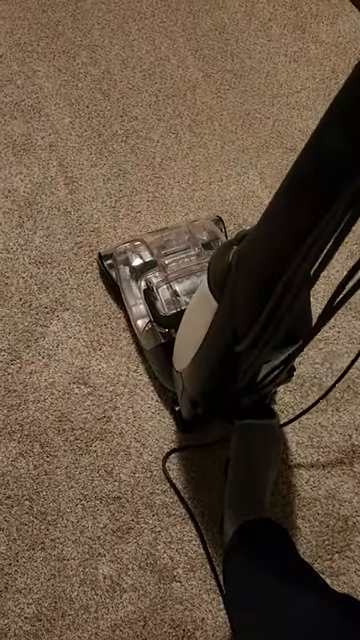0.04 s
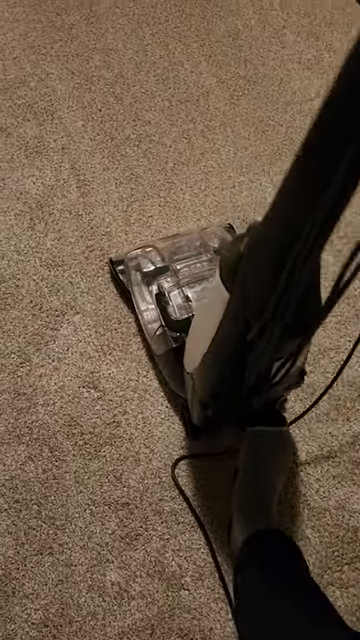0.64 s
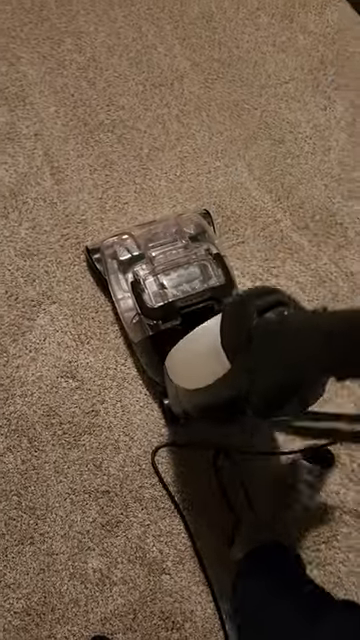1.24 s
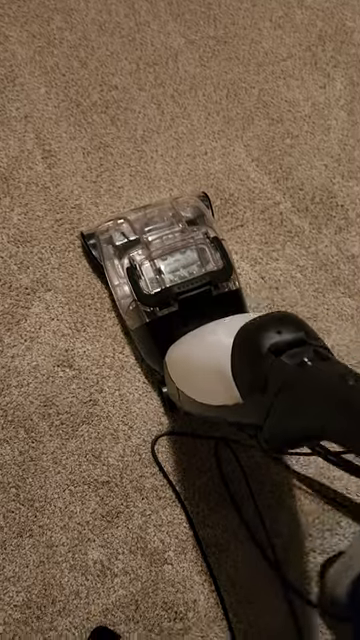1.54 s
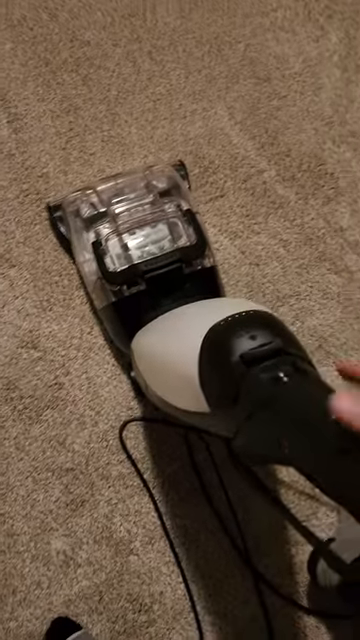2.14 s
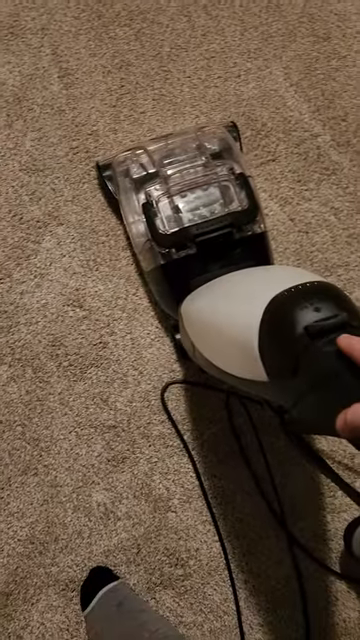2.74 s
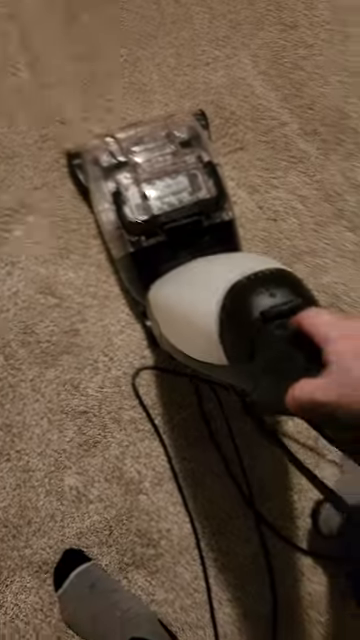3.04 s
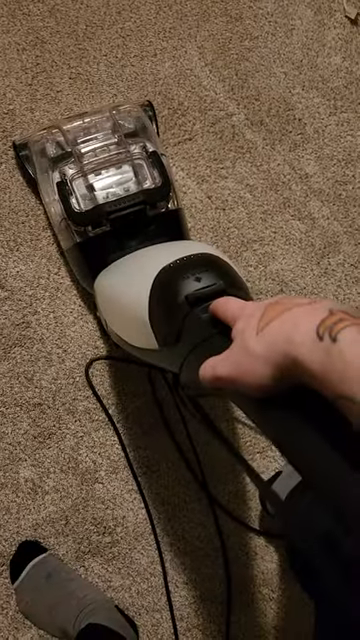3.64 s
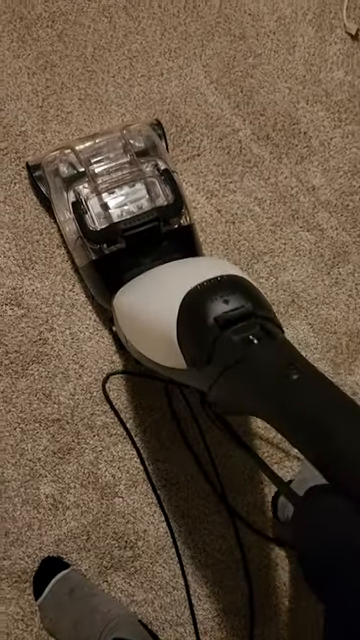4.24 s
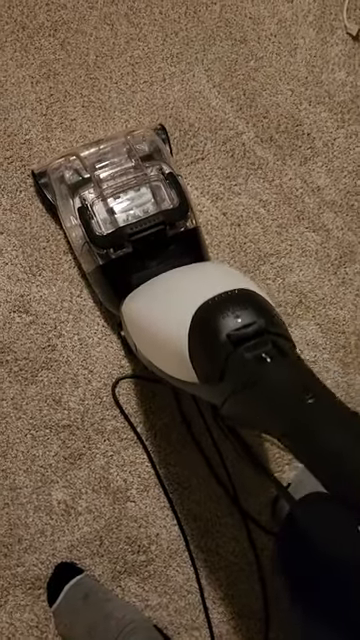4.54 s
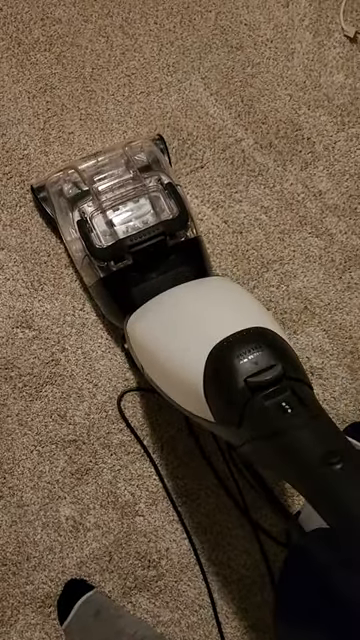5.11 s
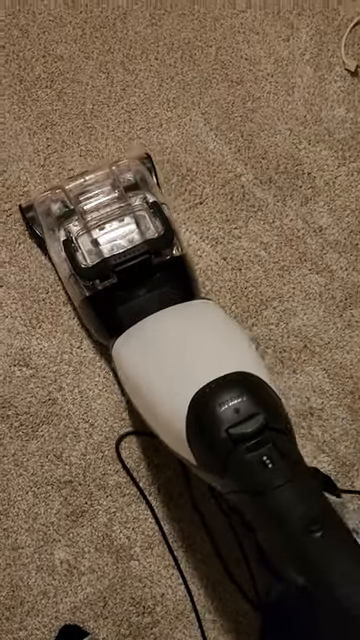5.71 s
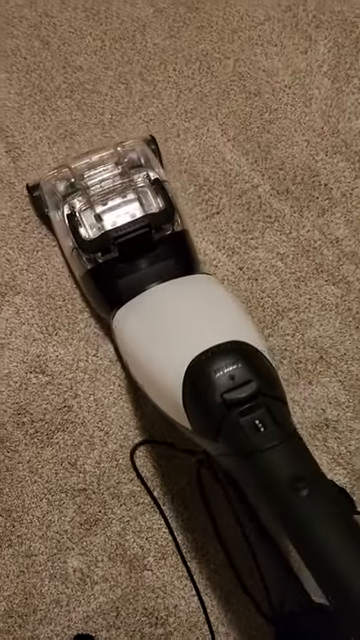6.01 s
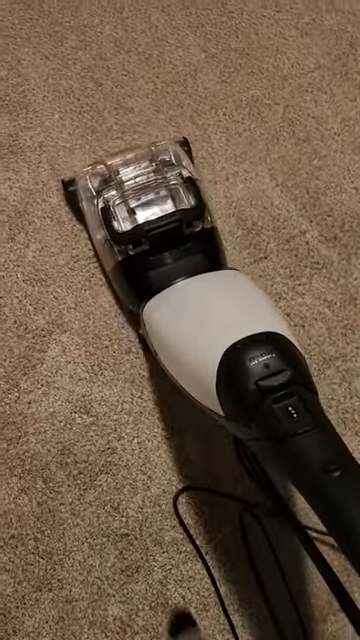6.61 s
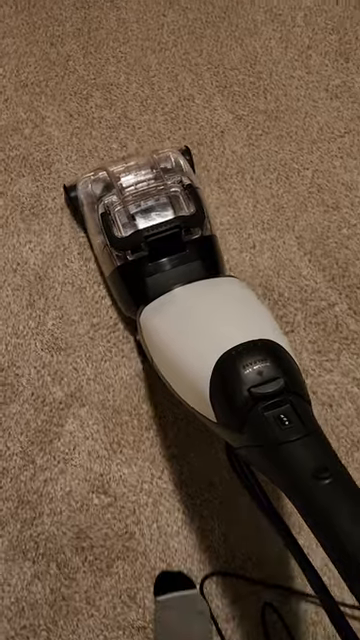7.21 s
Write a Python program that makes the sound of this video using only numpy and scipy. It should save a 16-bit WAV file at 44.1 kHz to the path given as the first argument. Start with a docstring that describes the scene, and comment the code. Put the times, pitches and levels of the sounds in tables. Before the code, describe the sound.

Heard from the handle in a room with little echo, an upright carpet cleaner gives a few plastic knocks as it leans back, followed by faint rustling of clothing and carpet. After a short lull, its power switch clicks sharply. The motor spins up with a rising whine and settles into a constant, humming roar of air, with one soft footstep barely audible beneath it.

```python
"""Plastic knocks as an upright carpet cleaner is tilted back, heard from its handle in a carpeted room.
Cloth brushes softly, the rocker switch snaps and the suction motor runs up. The windings hum,
shaft unbalance and fan blades give a rising whine, and turbulent air roars through the housing,
hisses from the vents and whistles in the ducts. One soft footfall lands under the roar."""
import sys
import numpy as np
from scipy import signal
from scipy.io import wavfile
from scipy.ndimage import uniform_filter1d

SR = 44100
rng = np.random.default_rng(int(sys.argv[2]) if len(sys.argv) > 2 else 0)


def bounce(signal):
    """Save signal as a 16-bit WAV file at the path given by the first command-line argument."""
    frames = np.transpose(np.atleast_2d(signal))
    limited = np.clip(frames, -1, 1)
    pcm = np.round(limited * 32767).astype(np.int16)
    wavfile.write(sys.argv[1], SR, pcm)


N = 324576
TIME = np.arange(N) / SR
SNAP_S, POWER_ON_S, FULL_SPEED_HZ = 3.6434, 3.646, 405.75

# Noise spectra. Each row: frequency in Hz, relative density in dB.
AMBIENT_SPECTRUM = [(15, -9), (30, -1), (62, 0), (98, -13), (190, -8), (270, -17), (350, -10), (480, -26),
                    (750, -27), (1100, -37), (1500, -35), (2800, -48), (6500, -55), (7700, -44),
                    (8800, -60), (16000, -63)]
CARPET_SPECTRUM = [(90, -33), (170, 7.5), (270, -4), (480, -5.5), (750, -3), (1150, -14), (1500, -10),
                   (2200, -12), (2700, -21), (3500, -25.5), (8000, -25), (9500, -62)]
CLOTH_SPECTRUM = [(700, -30), (1200, -12), (1550, -5.5), (2200, -5), (2650, -13), (3100, -7), (3800, -10),
                  (5200, -6.5), (6500, -11), (7600, -4.5), (9000, -11), (10500, -16.5), (12000, -11.5),
                  (15500, -18)]
SOCK_SPECTRUM = [(1000, -22), (3800, -10), (4800, -2), (5600, -2), (6500, -15), (16000, -35)]
RUMBLE_SPECTRUM = [(30, -38), (85, -14), (108, -6.5), (200, -2), (340, 0), (500, 2.5), (720, 1.5),
                   (900, -5), (1150, -8), (2500, -48)]
RUSH_SPECTRUM = [(400, -40), (850, -1), (1100, 1), (1450, -1), (1750, -1), (2080, -2.5), (2250, -4),
                 (2600, -6), (2900, -14), (4500, -37)]
HISS_SPECTRUM = [(1500, -13), (3000, -2.5), (3600, -1.5), (4150, -4), (4900, 0), (5600, -2), (6100, -1.5),
                 (6700, -3), (7500, -0.5), (9200, -10.5), (10900, -10), (11600, -5.5), (13000, -7),
                 (14000, -11), (16000, -9.5)]

# Stereo likeness of noise. Each row: frequency in Hz, left-right coherence from 0 to 1.
COHERENCE = [(25, .8), (70, .97), (130, .985), (290, .92), (640, .8), (1000, .55), (2000, .5), (3500, .2),
             (16000, .15)]
# Stereo balance of noise. Each row: frequency in Hz, left over right in dB.
BALANCE = [(60, 0.5), (110, 0), (200, 0.5), (380, 1.5), (700, 2), (1290, -1), (2380, 4), (4400, 1),
           (8120, 2.5), (15000, -0.5)]
# Stereo phase of noise. Each row: frequency in Hz, left lead in radians.
LEFT_LEAD = [(300, 0), (860, .25), (1300, 1.4), (2000, 1.8), (3000, 1.8), (16000, 1.6)]
# Room decay. Each row: frequency in Hz, T60 in seconds.
ROOM_DECAY = [(100, 0.16), (500, 0.22), (2000, 0.27), (8000, 0.15), (16000, 0.058)]

# Peaks and dips. Each row: centre in Hz, width in Hz, gain in dB.
ROOM_MODES = [(157, 12, 8), (173, 10, -8), (190, 12, 7), (236, 14, -4), (283, 14, 3), (300, 12, -6),
              (538, 16, -8)]
HOUSING_MODES = [(338, 72, 7), (455, 20, 0), (498, 25, 1), (570, 44, 3.5), (699, 12, 7.5), (747, 70, -3),
                 (816, 54, 6.5), (955, 27, -3), (1054, 20, -9), (1098, 10, 3.5), (1261, 17, 6.5),
                 (1360, 37, 2), (1458, 45, 10), (1610, 41, 6), (1866, 72, 9.5), (2316, 26, 6)]
TONE_RESPONSE = [(266, 50, 6.5), (301, 5.2, -11), (345.8, 14, 9.5), (367.4, 5, -18), (376.3, 22, 5),
                 (548, 68, -14), (668, 30, 3.5), (714, 18, 6), (754, 31, -14.5), (1400, 220, 6),
                 (1710, 180, -11), (2150, 170, 5.5), (2290, 65, -10), (2580, 230, 5.5), (2740, 104, -15.5)]  # housing and room, as swept by the motor tones

# Weight shifts on the pile. Each row: peak time in seconds, level in dB.
WEIGHT_SHIFTS = [(.45, -64.5), (1.0, -65.5), (1.68, -71), (1.85, -57.5), (2.2, -74), (2.82, -57),
                 (3.1, -72)]
# Fabric strokes. Each row: start, rise and hold in seconds, cloth and sock levels in dB.
FABRIC_STROKES = [(.7, .2, .15, -76, -90), (1.169, .16, 0.053, -62, -58.5), (1.486, 0.33, 0.068, -57, -67),
                  (1.855, 0.035, .015, -53, -75), (2.055, 0.047, 0.058, -51, -51.5),
                  (2.137, 0.073, 0.098, -52.5, -67), (2.642, 0.07, 0.091, -60.5, -80),
                  (3.22, 0.093, .04, -73, -90)]
# Ring of the plastic body. Each row: frequency in Hz, relative level in dB, T60 in seconds.
BODY_MODES = [(182, -3, 0.058), (377, -1, 0.029), (500, 3, 0.026), (700, 4, 0.015), (816, 7, 0.016),
              (1150, 0, 0.021), (1900, 2, 0.017), (2295, -6, 0.029), (5260, -4.5, 0.028), (7520, 11, 0.012)]
# Joint ticks. Each row: start in seconds, level in dB, low and high edge in Hz, rattle decay in seconds.
JOINT_TICKS = [(.295, -41, 350, 1800, 0.015), (0.315, -44, 200, 700, 0.0095), (.568, -50, 900, 1600, .008),
               (.684, -45.5, 1730, 3800, .011), (.818, -43.5, 600, 1470, .015),
               (.849, -32, 400, 1350, .025), (0.9346, -39, 500, 2500, .006), (1.18, -39, 350, 1900, .014),
               (1.244, -43, 500, 4000, .014), (1.246, -53, 4000, 14000, .008),
               (1.44, -51.5, 500, 1810, .01), (1.855, -43.5, 300, 1290, 0.018),
               (2.13, -44, 546, 1390, .015), (2.81, -49, 600, 2980, .007), (3.596, -48, 1110, 2600, 0.011)]
# Handle unlatching, base dropping back. Each row: start in seconds, level in dB, high edge in Hz, rattle
# share from 0 to 1, rattle decay in seconds, crack and thud levels in dB, thud decay in seconds.
TILT_CLUNKS = [(0.3618, -36, 2360, 0.08, .04, -66, -38.5, .015),
               (.842, -26, 1400, 0.5, 0.015, -55.5, -30.5, 0.099),
               (0.9372, -28, 1570, .5, .018, -48, -37, .04)]

# Duct whistles. Each row: time in seconds, low whistle in dB, high whistle in Hz, high whistle in dB.
DUCT_WHISTLES = [(3.65, -74, 1700, -70), (4.0, -42, 1780, -36), (4.25, -30.5, 1849, -22.5),
                 (4.5, -29, 1900, -29.5), (5.4, -26, 1994, -30.5), (5.85, -21.5, 2041, -29),
                 (6.05, -23.5, 2060, -31), (6.17, -21, 2072, -22), (6.5, -29.5, 2080, -28),
                 (7.0, -22.5, 2060, -33), (7.36, -40, 2080, -34)]
# Winding hum. Each row: frequency in Hz, level in dB.
HUM_PARTIALS = [(119.9, -38), (240, -43.5), (360, -56)]
# Main tones in multiples of the shaft rate: shaft, its double, seven fan blades, their octave.
TONE_ORDERS = (1, 2, 7, 14)
# Voicing of those tones. Each row: base level in dB, shaft rate at half amplitude in Hz, onset exponent,
# waver ratio, left over right in dB, left lead in radians.
MOTOR_TONES = [(-21, 247, 17, 0.087, 2.5, 0.21), (-26.5, 234, 8.2, 0.29, 1, 0.45),
               (-34.5, 215, 4.4, 0.29, 2, 1.4), (-41.5, 380, 28, 0.4, 1, 0.83)]
# Fading as the listener moves through standing waves. Each row: time in seconds, four tone gains in dB.
TONE_FADING = [(4.5, 1, 2, -1, 0), (4.7, -2.5, 2, 0.5, 5.5), (5.0, 1, 4, -3, 0), (5.22, -2, 0.5, 1.5, 5),
               (5.45, -9.5, -3, 2.5, -6), (5.68, -7.5, -2.5, 4.5, 2), (5.85, -2.5, -0.5, 8.5, 3.5),
               (6.2, -3.5, -5.5, 0, 8.5), (6.55, -4, 2, 1.5, -14), (6.9, -12, 2.5, 1.5, 4),
               (7.12, -8.5, 3.5, 4.5, -8), (7.36, -37, 5.5, -5, 0)]
# Faint overtones. Each row: multiple of the shaft rate, level at top speed in dB.
SHAFT_OVERTONES = [(3, -54), (4, -38), (5, -32.5), (12, -49), (19, -45.5), (21, -48.5), (28, -65)]


def amp(db):
    return 10 ** (np.asarray(db) / 20)


def unit_rms(x):
    return x / np.sqrt(np.mean(abs(x) ** 2) + 1e-20)


def log_interp(points, hz):
    knots_hz, values = np.transpose(points)
    return np.interp(np.log(hz + 1), np.log(knots_hz + 1), values)


def time_curves(rows):
    knots_s, *columns = np.transpose(rows)
    return [np.interp(TIME, knots_s, column) for column in columns]


def resonance_db(modes, hz):
    return sum(db / (1 + (2 * (hz - centre_hz) / width_hz) ** 2) for centre_hz, width_hz, db in modes)


def add(mix, start_s, sound):
    part = mix[:, round(start_s * SR):][:, :sound.shape[1]]
    part += sound[:, :part.shape[1]]


def drift(corner_hz, hop=64):
    """Slow complex noise, rms 1."""
    count = N // hop + 2
    white = rng.standard_normal(count) + 1j * rng.standard_normal(count)
    hz = np.fft.fftfreq(count, hop / SR)
    slow = np.fft.ifft(white / (1 + (hz / corner_hz) ** 2))
    return unit_rms(np.interp(np.arange(N), np.arange(count) * hop, slow))


def noise(spectrum, modes=(), patchy_db=0.5, size=4096):
    """Coloured stereo noise with drifting patches, rms 1; the bass is alike on both sides."""
    hz = np.fft.rfftfreq(size, 1 / SR)
    left_re, left_im, own_re, own_im, patches = rng.standard_normal((5, N * 4 // size + 5, len(hz)))
    patches = uniform_filter1d(patches, size=4, axis=0)
    patches = unit_rms(uniform_filter1d(patches, size=30, axis=1))
    db = log_interp(spectrum, hz) + resonance_db(modes, hz) + patchy_db * patches
    # standing reflections comb the treble, differently on each side
    comb = unit_rms(uniform_filter1d(rng.standard_normal((2, 1, len(hz))), size=5))
    db = db + 1.7 * comb * np.clip(hz / 3000, 0, 1)
    coherence = log_interp(COHERENCE, hz)
    left = left_re + 1j * left_im
    right = coherence * left + np.sqrt(1 - coherence ** 2) * (own_re + 1j * own_im)
    right *= np.exp(-1j * log_interp(LEFT_LEAD, hz))
    pan = amp(log_interp(BALANCE, hz) / 2)
    frames = np.array([left * pan, right / pan]) * amp(db)
    _, wave = signal.istft(frames.swapaxes(1, 2), nperseg=size, noverlap=size - size // 4)
    return unit_rms(wave[:, :N])


def tone(turns, db, waver, pan_db=0, lead_rad=0):
    """One partial; shifting reflections make it waver differently on each side."""
    direct = np.array([[amp(pan_db / 2) * np.exp(1j * lead_rad)], [amp(-pan_db / 2)]])
    paths = (direct + waver * np.array([drift(4.3), drift(14)])) / np.sqrt(1 + waver ** 2)
    return np.sqrt(2) * amp(db) * (paths * np.exp(2j * np.pi * turns)).real


def room_tail(x, size=16384, density=0.08, gap_s=0.006):
    """Scattered reflections with a short decay."""
    taps = rng.standard_normal((2, size)) * (rng.random((2, size)) < density)
    taps *= np.arange(size) > gap_s * SR
    hz, t, frames = signal.stft(taps, SR, nperseg=256)
    decay = amp(-60 * t / log_interp(ROOM_DECAY, hz)[:, None])
    _, tail = signal.istft(frames * decay, SR, nperseg=256)
    return signal.fftconvolve(x, tail / np.linalg.norm(tail[0]), axes=1)[:, :N]


def ambience(db=-56.5):
    """Faint low rumble of the still room."""
    return amp(db) * noise(AMBIENT_SPECTRUM)


def carpet_rustle(rest_db=-70, rise_s=0.081, fall_s=0.16):
    """The pile rustles under the base, more with each shift of weight."""
    swells = sum(amp(db) * np.exp(-np.maximum((peak_s - TIME) / rise_s, (TIME - peak_s) / fall_s))
                 for peak_s, db in WEIGHT_SHIFTS)
    return (amp(rest_db) + swells) * noise(CARPET_SPECTRUM, ROOM_MODES, patchy_db=1.2)


def brushing(release_s=0.083):
    """Cloth and socks stroke the pile; fibres catch and slip."""
    cloth, sock = np.zeros((2, N))
    for start_s, rise_s, hold_s, cloth_db, sock_db in FABRIC_STROKES:
        t = TIME - start_s
        stroke = np.clip(t / rise_s, 0, 1) * np.exp(-np.maximum(t - rise_s - hold_s, 0) / release_s)
        cloth = np.hypot(cloth, amp(cloth_db) * stroke)
        sock = np.hypot(sock, amp(sock_db) * stroke)
    slip = amp(drift(60).real)
    return slip * (cloth * noise(CLOTH_SPECTRUM, size=512) + sock * noise(SOCK_SPECTRUM, size=512))


def impact(db, band_hz, rattle, decay_s, ring=0.052, size=8192):
    """A sharp push and a dying rattle ring the plastic body; energy equals 1.9 ms at level db."""
    t = np.arange(size) / SR
    body = ring * sum(amp(mode_db - 60 * t / t60_s) * np.cos(2 * np.pi * hz * t)
                      for hz, mode_db, t60_s in BODY_MODES)
    body[0] += 1  # direct path
    shared, *sides = rng.standard_normal((3, size))
    chatter = (shared + 0.55 * np.array(sides)) * np.exp(-t / decay_s)
    force = np.sqrt(1 - rattle) * (t == 0) + np.sqrt(rattle) * chatter / np.linalg.norm(chatter[0])
    bandpass = signal.butter(4, band_hz, "band", fs=SR, output="sos")
    hit = signal.fftconvolve(signal.sosfilt(bandpass, force), body[None], axes=1)[:, :size]
    return amp(db) * hit / np.linalg.norm(hit[0]) * np.sqrt(0.0019 * SR)


def footfall(start_s=5.225):
    """One soft, low thump on the carpet."""
    out = np.zeros((2, N))
    add(out, start_s, impact(db=-23, band_hz=(30, 130), rattle=0.1, decay_s=0.03))
    return out


def joints():
    """Plastic joints tick; heavier clunks crack at the latch and thud into the floor."""
    out = np.zeros((2, N))
    for start_s, db, low_hz, high_hz, decay_s in JOINT_TICKS:
        add(out, start_s, impact(db, (low_hz, high_hz), rattle=0.75, decay_s=decay_s))
    for start_s, db, high_hz, rattle, decay_s, crack_db, thud_db, thud_decay_s in TILT_CLUNKS:
        add(out, start_s, impact(db, (385, high_hz), rattle, decay_s))
        add(out, start_s, impact(crack_db, (1800, 3800), rattle, decay_s))
        add(out, start_s, impact(thud_db, (135, 325), rattle, thud_decay_s))
    return out


def rocker_switch(travel_s=0.0035):
    """The rocker scrapes over its spring, snaps, rings its cap and chatters."""
    scrape = impact(db=-44, band_hz=(1200, 13000), rattle=0.99, decay_s=0.005)
    snap = impact(db=-23.5, band_hz=(1500, 14500), rattle=0.85, decay_s=0.0007, ring=0.025)
    cap = impact(db=-22, band_hz=(1470, 2180), rattle=0.13, decay_s=0.017)
    chatter = impact(db=-39, band_hz=(3000, 15000), rattle=0.98, decay_s=0.018, ring=0.012)
    out = np.zeros((2, N))
    add(out, SNAP_S - travel_s, scrape)
    add(out, SNAP_S, snap + cap)
    add(out, SNAP_S + travel_s, chatter)
    return out


def powered_s():
    return np.maximum(TIME - POWER_ON_S, 0)


def shaft_hz(kick_share=0.1068, kick_s=0.0356, climb_s=0.2931, creep_hz_per_s=1.79):
    """Run-up: a quick kick, a slower climb, then a slight creep as the motor warms."""
    t = powered_s()
    lag = kick_share * np.exp(-t / kick_s) + (1 - kick_share) * np.exp(-t / climb_s)
    surge_hz = 1.45 * np.exp(-abs(TIME - 5.52) / 0.14)  # the load eases briefly
    return np.maximum((FULL_SPEED_HZ + creep_hz_per_s * t) * (1 - lag) + surge_hz, 1)


def mains_hum():
    """The windings hum at twice the mains rate and its harmonics."""
    return sum(tone(hz * TIME, db, waver=0.12, pan_db=0.8) for hz, db in HUM_PARTIALS)


def commutator(turns, speed_hz, db=-39, order=12, centre_hz=1950, width_hz=500):
    """The brushes chirp once as their rate sweeps through a housing resonance."""
    detuning = 2 * (order * speed_hz - centre_hz) / width_hz
    return tone(order * turns, db, waver=1, lead_rad=1.2) / (1 + detuning ** 4)


def whistles(low_hz=643, low_spread_hz=19, high_spread_hz=45):
    """The air stream blows two duct resonances into fuzzy tones."""
    low_db, high_hz, high_db = time_curves(DUCT_WHISTLES)
    low_fuzz = drift(low_spread_hz) + 0.31 * np.array([drift(low_spread_hz), drift(low_spread_hz)])
    high_fuzz = np.array([drift(high_spread_hz), drift(high_spread_hz)])
    low = amp(low_db) * low_fuzz * np.exp(2j * np.pi * low_hz * TIME)
    high = amp(high_db) * high_fuzz * np.exp(2j * np.pi * np.cumsum(high_hz) / SR)
    return np.sqrt(2) * (low + high).real


def motor_whine(fan_echo=0.4):
    """Unbalance sings at the shaft rate, the fan at its blade rate, with fainter overtones."""
    speed_hz = shaft_hz()
    turns = np.cumsum(speed_hz * (1 + 0.0007 * drift(25).real)) / SR
    partials = []
    for order, voicing, fading_db in zip(TONE_ORDERS, MOTOR_TONES, time_curves(TONE_FADING)):
        base_db, entry_hz, exponent, waver, pan_db, lead_rad = voicing
        onset = 1 / (1 + (entry_hz / speed_hz) ** exponent)
        db = base_db + resonance_db(TONE_RESPONSE, order * speed_hz) + fading_db
        partials.append(onset * tone(order * turns, db, waver, pan_db, lead_rad))
    shaft = sum(partials[:2])
    fan = sum(partials[2:]) + commutator(turns, speed_hz)
    speed_share = speed_hz / speed_hz.max()
    # during run-up the room still rings at the lower pitch of a moment ago
    fan += fan_echo * room_tail(fan * (1 - speed_share ** 12))
    overtones = sum(tone(order * turns, db, waver=1.7, lead_rad=1.9) for order, db in SHAFT_OVERTONES)
    return shaft + fan + speed_share ** 8 * overtones


def flow_gain(db, exponent, jolt_db, jolt_s=0.025):
    """Air noise gain: a dying jolt at switch-on plus a power of the shaft speed."""
    jolt = amp(jolt_db) * np.exp(-powered_s() / jolt_s)
    return jolt + amp(db) * (shaft_hz() / FULL_SPEED_HZ) ** exponent


def air_roar(hiss_db_per_s=0.5):
    """Turbulence rumbles and rushes through the housing and hisses out of the vents."""
    rumble = noise(RUMBLE_SPECTRUM, HOUSING_MODES + ROOM_MODES, patchy_db=1.57, size=8192)
    rush = noise(RUSH_SPECTRUM, HOUSING_MODES, patchy_db=0.94)
    hiss = noise(HISS_SPECTRUM, patchy_db=1, size=2048) * amp(hiss_db_per_s * (powered_s() - 2))
    return (rumble * flow_gain(db=-21.5, exponent=1.44, jolt_db=-28)
            + rush * flow_gain(db=-21.5, exponent=2.24, jolt_db=-36)
            + hiss * flow_gain(db=-27.5, exponent=2.68, jolt_db=-35.5))


def scene(tail_db=-12, fade_in_s=0.0067):
    background = ambience()
    hits = joints() + rocker_switch() + footfall()
    handling = hits + amp(tail_db) * room_tail(hits) + brushing() + carpet_rustle()
    power = np.clip((TIME - POWER_ON_S) / fade_in_s, 0, 1)
    return background + handling + power * (motor_whine() + mains_hum() + air_roar() + whistles())


def record(dry, cutoff_hz=15780):
    """Steep low-pass."""
    lowpass = signal.firwin(511, cutoff_hz, window=("kaiser", 9), fs=SR)
    return signal.oaconvolve(dry, lowpass[None], "same")


dry = scene()
out = record(dry)
bounce(out)
```